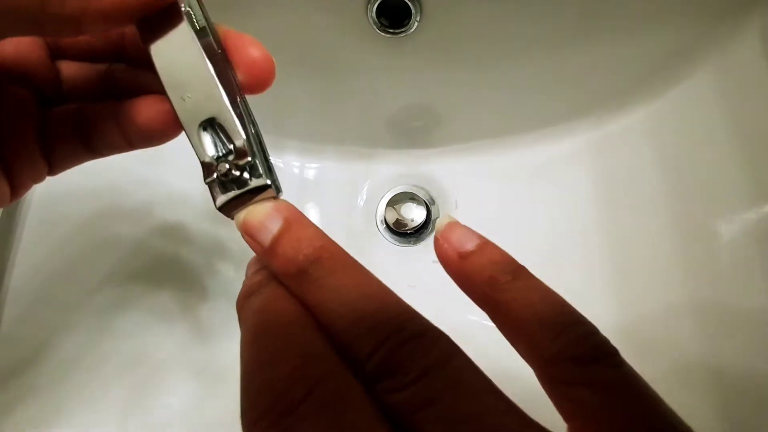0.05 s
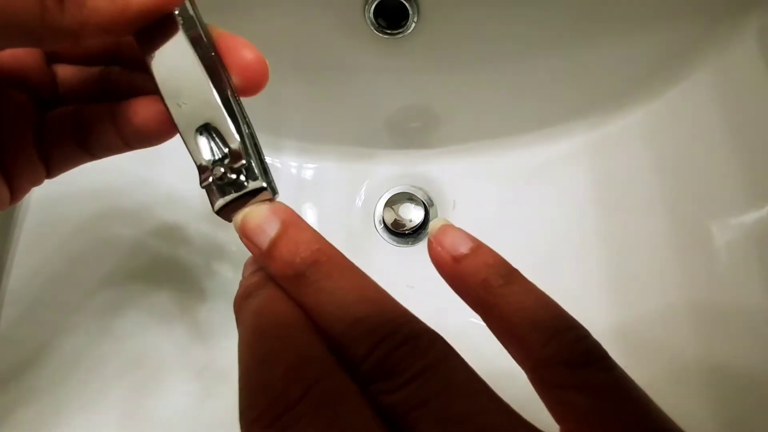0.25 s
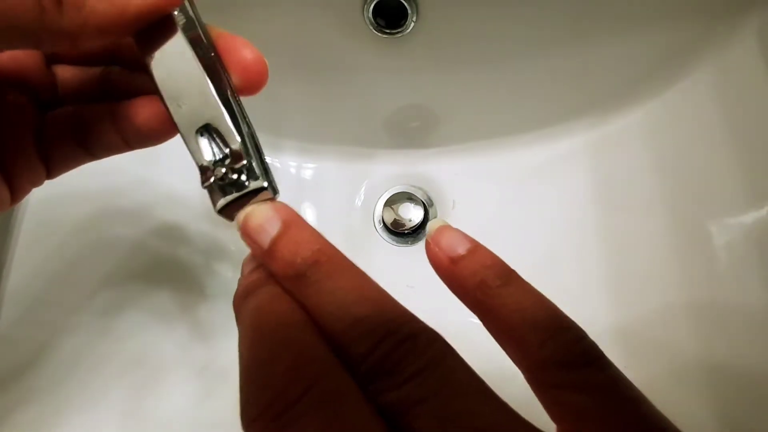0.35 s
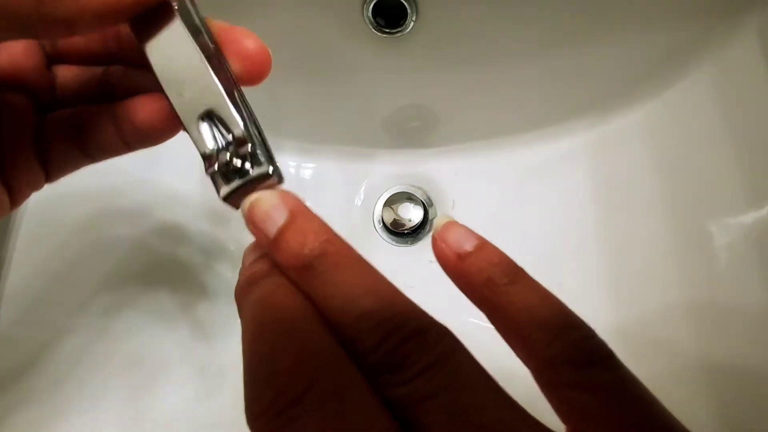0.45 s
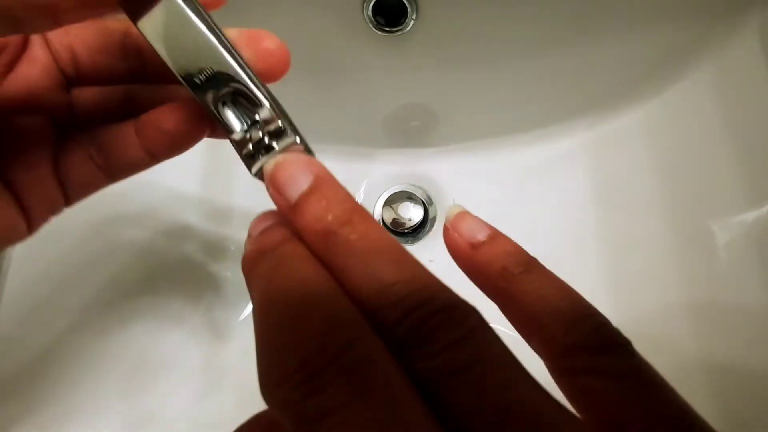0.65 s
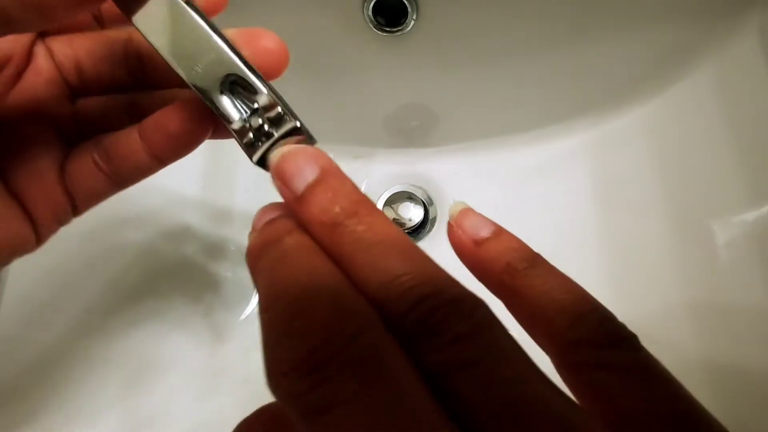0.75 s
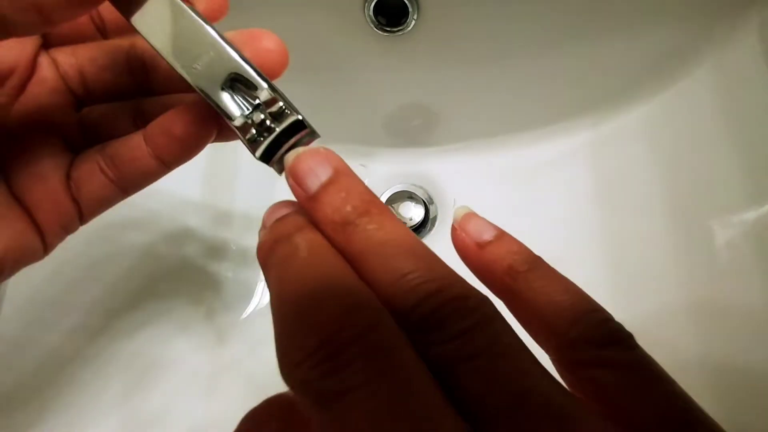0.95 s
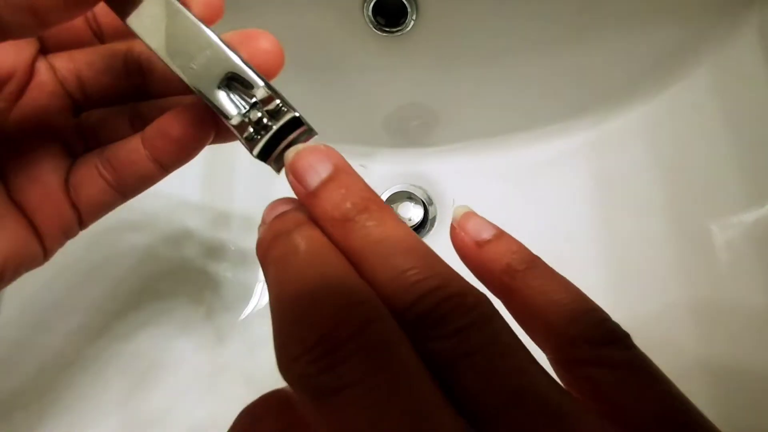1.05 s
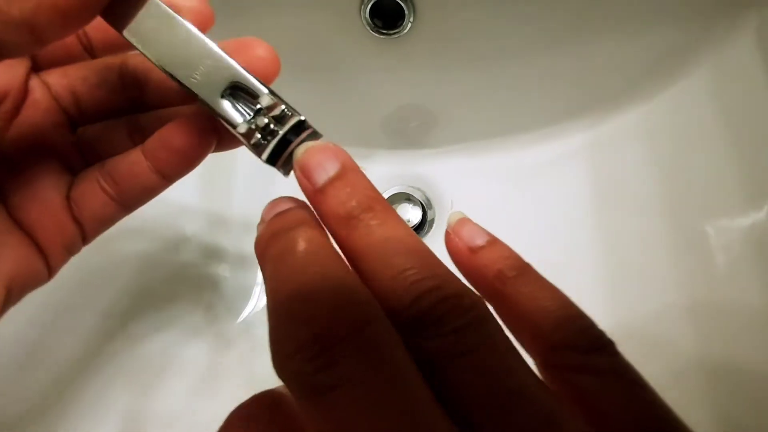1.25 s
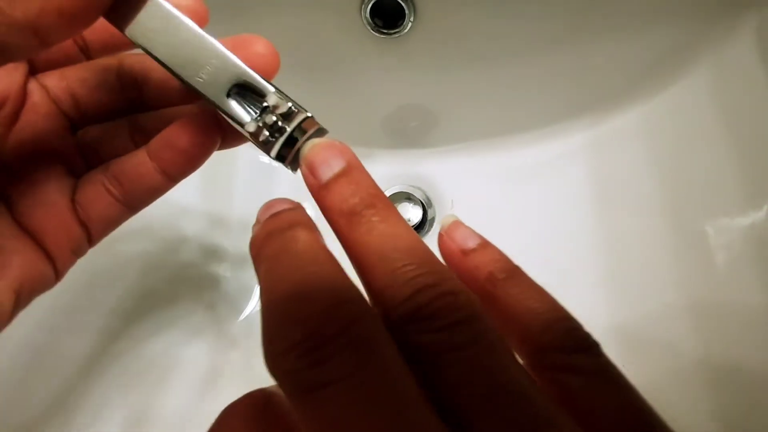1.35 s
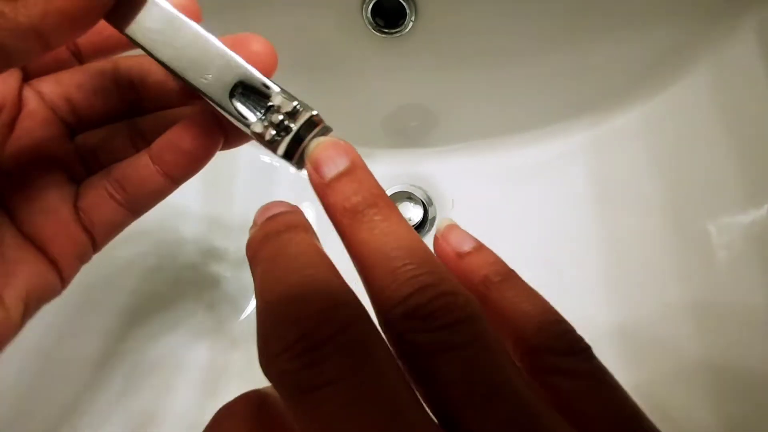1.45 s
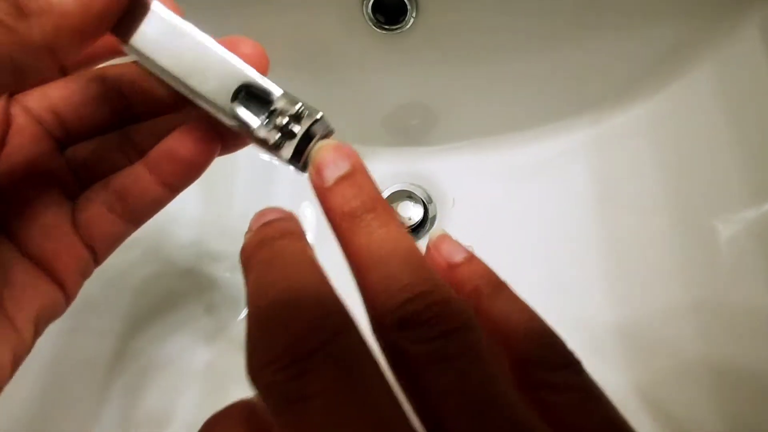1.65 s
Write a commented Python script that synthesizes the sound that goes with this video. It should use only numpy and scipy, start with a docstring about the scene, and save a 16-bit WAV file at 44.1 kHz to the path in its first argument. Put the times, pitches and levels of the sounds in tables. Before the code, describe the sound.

One hard metallic clipper click with a dull nail crack inside it, ringing briefly off basin and walls, then two tiny porcelain ticks and barely audible hand rustle, heard close on a phone microphone in a quiet bathroom.

```python
"""Nail clipper over a basin

A steel nail clipper snaps shut in a quiet tiled bathroom, close to a two-port phone microphone.
Impulses ring decaying modes for jaws, chattering lever, cracking nail and clipping ticking twice in the basin.
Shaped noise tails echo the hits; a decaying low cosine jolts mainly the left port.
Shaped noise makes finger brush, rustles, air and low rumble; sines make mains hum and a throbbing rumble."""
import sys
import numpy as np
from scipy import signal
from scipy.fft import rfft, irfft
from scipy.io import wavfile

SR = 44100
rng = np.random.default_rng(int(sys.argv[2]) if len(sys.argv) > 2 else 0)


def volts_from_db(level):
    """Convert decibel levels to linear amplitude ratios."""
    exponent = np.asarray(level, float) / 20
    return 10 ** exponent


def generate_wav(signal):
    """Clip the signal to [-1, 1] and save it as 16-bit WAV at the path in sys.argv[1]."""
    frames = np.transpose(np.atleast_2d(signal))
    scaled = np.clip(frames, -1, 1) * 32767
    pcm = np.round(scaled).astype(np.int16)
    wavfile.write(sys.argv[1], SR, pcm)


N = 74970


def evened(x):
    """Scales to rms 1."""
    return x / np.sqrt(np.mean(x ** 2) + 1e-20)


def read(points, hz):
    """Interpolates a table on a log-frequency axis."""
    f, value = np.transpose(points)
    return np.interp(np.log(hz + 1), np.log(f + 1), value)


def curve(points):
    """Joins (s, dB) rows into a gain for every sample."""
    s, db = np.transpose(points)
    return volts_from_db(np.interp(np.arange(N) / SR, s, db))


def noise(points, likeness):
    """Two-channel noise of rms 1 with a given spectrum and likeness between channels."""
    hz = np.fft.rfftfreq(N, 1 / SR)
    a, b = rfft(rng.standard_normal((2, N)))
    c = np.clip(read(likeness, hz), -1, 1)
    right = c * a + np.sqrt(1 - c ** 2) * b
    return evened(irfft(np.array([a, right]) * volts_from_db(read(points, hz)), N))


def burst(start_s, length_s, rise_s):
    """A linear rise, a plateau and a linear fall 1.6 times as long as the rise."""
    t = np.arange(N) / SR - start_s
    return np.clip(t / rise_s, 0, 1) * np.clip((length_s - t) / (1.6 * rise_s), 0, 1)


def wander(top_hz):
    """A slow random drift of rms 1: sines from 0.5 Hz up, weaker as they get faster."""
    t = np.arange(N) / SR
    rates_hz = np.geomspace(.5, top_hz, 16)
    return evened(sum(np.sin(2 * np.pi * (f * t + rng.random())) / np.sqrt(f) for f in rates_hz))


def ring(modes, tilt=((1, 0),)):
    """One blow on decaying modes of alternating sign, peak 1, with random phases at each port."""
    t = np.arange(1500) / SR
    out = np.zeros((2, len(t)))
    for k, (hz, db, t60) in enumerate(modes):
        decay = volts_from_db(db + read(tilt, hz) - 60 * t / t60)
        phase_turns = .15 * rng.random((2, 1))
        out += (-1) ** k * decay * np.sin(2 * np.pi * (hz * t + phase_turns))
    out *= np.minimum(t / .00012, 1)  # soft contact
    return out / abs(out).max()


def strike(hits, response):
    """Every impulse sets off the response."""
    return signal.fftconvolve(hits, response, axes=1)[:, :N]


def click(s, db):
    """A single impulse."""
    out = np.zeros((1, N))
    out[0, round(s * SR)] = volts_from_db(db)
    return out


def pair(s, db, pan_db):
    """An impulse that reaches the right port 0.4 ms later; pan_db is left over right."""
    return np.vstack([click(s, db + pan_db), click(s + .0004, db)])


# Jaws meet and rebound: start_s, level_db (peak, right port)
SNAPS = [(.2313, 3), (.2318, 1), (.2329, -2), (.2341, -6)]
# Steel modes: pitch_hz, level_db (relative), t60_s
JAWS = [(1150, -24, 0.0014), (2397, -23, .002), (3400, -20.5, 0.0015), (4096, -21.5, .002),
        (5180, -2.5, 0.002005), (6100, -20.5, .002), (7000, -9.5, .002), (8772, -1.5, 0.0053),
        (9497, -0.5, 0.0015), (10110, -1.5, 0.0038), (12134, -7.5, 0.0067), (14560, -7, 0.004),
        (14800, -8.5, 0.0027), (14830, -14.5, 0.00067)]


def jaws():
    """Jaw impacts ring the steel's modes."""
    pan_db = -3.5
    hits = sum(pair(s, db, pan_db) * rng.choice([-1, 1], (2, 1)) for s, db in SNAPS)
    return strike(hits, ring(JAWS))


# Lighter knocks ring the low modes less: pitch_hz, gain_db
CHATTER_TILT = [(1000, -32), (2500, -10.5), (4200, -1.5), (7000, -6), (10000, 5.5), (12400, 1.5),
                (15000, 5)]


def chatter():
    """The lever chatters: random light knocks, drawn per port, ring the jaw modes."""
    start_s, length_s, knocks_per_s = .2365, .017, 5000
    floor_db, spread_db, pan_db = -12.5, 2.5, -2
    t = np.arange(N) / SR - start_s
    on = (t > 0) & (t < length_s) & (rng.random((2, N)) < knocks_per_s / SR)
    level_db = floor_db + spread_db * np.minimum(rng.exponential(1, (2, N)), 3)
    knocks = on * volts_from_db(level_db) * rng.choice([-1, 1], (2, N))
    knocks[0] *= volts_from_db(pan_db)
    return strike(knocks, ring(JAWS, CHATTER_TILT))


# Nail modes: pitch_hz, level_db (relative), t60_s
CRACK = [(395, -9, 0.0014), (1104, 2, 0.004), (2230, 1, .002), (3200, -0.5, .002)]


def crack():
    """The nail gives way: one impulse rings its dull modes, stronger at the left port."""
    start_s, level_db, pan_db = .2315, -22.5, 7.5
    return strike(pair(start_s, level_db, pan_db), ring(CRACK))


# Bounces: start_s, level_db (peak)
TICKS = [(.5008, -36), (.5025, -39), (.504, -43), (.5343, -41), (.5358, -45), (.5368, -45)]
# Porcelain modes: pitch_hz, level_db (relative), t60_s
BASIN = [(3560, -24.5, 0.0024), (4600, -16.5, 0.0021), (5500, -18.5, 0.0037), (6850, -1, 0.00069),
         (8250, -7.5, 0.0047), (9000, -4.5, 0.0044), (9540, -9.5, 0.0052), (12200, -10, 0.0017),
         (14200, -15, 0.0028), (14940, -11.5, 0.0028)]


def clipping():
    """The cut nail bounces on the porcelain and rings its modes."""
    hits = sum(click(s, db) for s, db in TICKS)
    return strike(hits, ring(BASIN))


def jolt():
    """A low wobble of the phone body, mainly at the left port, peaking just after the snap."""
    peak_s, pitch_hz, level_db, right_db = .2442, 56, -23, -26  # right_db is relative to left
    rise_s, fall_s = .005, .0095
    t = np.arange(N) / SR - peak_s
    shape = np.where(t < 0, np.exp(-.5 * (t / rise_s) ** 2), np.exp(-abs(t) / fall_s))
    return volts_from_db(level_db) * shape * np.cos(2 * np.pi * pitch_hz * t) * np.array([[1], [volts_from_db(right_db)]])


def echo(x, decays, db, delay_s, tilt=((1, 0),)):
    """Dense reflections after a delay, each band dying at its own speed."""
    hz, t, z = signal.stft(rng.standard_normal((2, SR // 2)), SR, nperseg=128)
    fade_db = read(tilt, hz)[:, None] - 60 * t / read(decays, hz)[:, None]
    tail = signal.istft(z * volts_from_db(fade_db), SR, nperseg=128)[1]
    tail *= np.clip((np.arange(tail.shape[1]) / SR - delay_s) / 0.0035, 0, 1)
    return volts_from_db(db) * strike(x, tail / np.linalg.norm(tail[0]))


# Basin decay: pitch_hz, t60_s
BOWL = [(1000, 0.024), (3000, 0.098), (6000, 0.17), (10000, .13), (15000, 0.16)]


def basin_echo(x):
    """Early, short reflections in the basin."""
    return echo(x, BOWL, -2.5, .0012)


# Tiled room decay: pitch_hz, t60_s
WALLS = [(500, 0.452), (1500, 0.5), (3000, .42), (5000, 0.38), (7000, .26), (9500, 0.47), (11500, .2),
         (14500, .21), (16000, .17)]
# Tiled room colour: pitch_hz, gain_db
WALL_TILT = [(500, 5), (1100, 4), (2000, 6.5), (3000, 6), (4000, 8), (5200, 2.5), (6500, 7.5), (7500, -2),
             (9500, 2), (12000, 0.5), (15000, 0)]


def wall_echo(x):
    """Later, longer reflections from the walls."""
    return echo(x, WALLS, -12.5, 0.0067, WALL_TILT)


# Skin on steel: pitch_hz, density_db_per_hz (relative)
BRUSH = [(3000, -26), (7000, -22), (9000, -11.5), (10500, -32), (13200, -26), (14600, -9), (15800, -13)]


def finger_brush():
    """Skin brushes the steel: a thin burst of shaped hiss."""
    start_s, length_s, rise_s, level_db = .7, 0.075, .006, -70
    return volts_from_db(level_db) * noise(BRUSH, [(1, 0.2)]) * burst(start_s, length_s, rise_s)


# A slide, a press, a slow shift of grip: start_s, length_s, rise_s
RUSTLE_TIMES = [(.28, .18, .025), (.67, .075, .01), (1.04, .3, .05)]
# One per rustle: level_db (rms before the envelope)
RUSTLE_DB = [-61.5, -62.5, -74.5]
# One spectrum per rustle: pitch_hz, density_db_per_hz (relative)
RUSTLE = [
    [(150, -8), (300, -10.5), (550, -0.5), (1000, -12), (2200, -5), (3500, -12.5), (6000, -20)],
    [(100, -13), (170, 5), (260, -2), (450, 4.5), (700, -14.5), (2000, -19), (4000, -40)],
    [(500, -7), (1200, 5.5), (2200, -3), (4000, -9.5), (7000, -20)],
]


def hand_rustle():
    """The hands rustle softly: three bursts of shaped noise."""
    rows = zip(RUSTLE_TIMES, RUSTLE_DB, RUSTLE)
    return sum(volts_from_db(db) * noise(colour, [(1, .5)]) * burst(*when) for when, db, colour in rows)


# Mains harmonics: pitch_hz, level_db (rms before waver and swell)
HUM = [(118.4, -64.5), (236.9, -80.5), (355.3, -87), (619.1, -85.5)]


def mains_hum():
    """Steady-pitched sines whose levels waver together."""
    waver_db, waver_top_hz = 2.5, 6  # waver_db is rms
    t = np.arange(N) / SR
    gain_db = waver_db * wander(waver_top_hz)
    return sum(volts_from_db(db + gain_db) * np.sqrt(2) * np.sin(2 * np.pi * (hz * t + rng.random())) for hz, db in HUM)


# Throb, two lists in sequence: time_s, level_db (rms)
RUMBLE = [
    [(0.0, -76), (0.018, -73), (0.03, -54.5), (0.04, -85), (0.054, -69), (0.072, -75), (0.096, -90),
     (0.134, -68), (0.164, -90), (0.2, -61.5)],
    [(0.3, -57), (0.412, -62.5), (0.432, -70), (0.482, -57.5), (0.522, -65), (0.548, -62), (0.592, -70),
     (0.622, -61), (0.662, -72), (0.696, -62), (0.732, -69), (0.798, -79), (0.83, -60), (0.938, -60.5),
     (1.13, -64.5), (1.262, -95), (1.286, -74.5), (1.31, -72.5), (1.512, -61.5), (1.55, -73), (1.59, -64),
     (1.7, -79.5)],
]


def throbbing_rumble():
    """A low sine of wandering pitch, throbbing in level."""
    pitch_hz, wander_hz, wander_top_hz = 59.2, 2.3, 30.0  # wander_hz is rms
    turns = np.cumsum(pitch_hz + wander_hz * wander(wander_top_hz)) / SR
    return curve(RUMBLE[0] + RUMBLE[1]) * np.sqrt(2) * np.sin(2 * np.pi * turns)


# Low rumble: pitch_hz, density_db_per_hz (relative)
SUB = [(15, -16.5), (35, -2), (60, -5), (90, -3), (140, -6.5), (200, -47.5)]


def low_rumble():
    """Low shaped noise, partly shared by the ports."""
    return volts_from_db(-69) * noise(SUB, [(1, 0.33)])


# Room air: pitch_hz, density_db_per_hz (relative)
AIR = [(82, -15), (140, -5), (185, -10), (235, -12), (343, -11), (453, -15.5), (623, -8), (1050, -19.5),
       (1280, -20), (4480, -29.5), (15100, -33.5), (16300, -41)]
# Left-right likeness: pitch_hz, correlation (-1 to 1)
SAME = [(60, 0.88), (180, 0.78), (550, 0.25), (1650, -0.19), (4970, -0.07), (15000, -0.31)]


def room_air():
    """Soft shaped noise, alike at both ports only in the lows."""
    return volts_from_db(-66.5) * noise(AIR, SAME)


# Background swell: time_s, gain_db
AIR_SWELL = [(0, -1.5), (.2, -2), (.5, -.5), (1.15, 1.4), (1.7, -1.2)]


def room_tone():
    """Air, hum and low rumble swell together; the throbbing rumble keeps its own level."""
    return curve(AIR_SWELL) * (room_air() + mains_hum() + low_rumble()) + throbbing_rumble()


def scene():
    """Hits with the basin's and the walls' echoes over the room tone."""
    tick_feed_db, crack_feed_db = 0.5, -6.5
    snap, nail, ticks = jaws() + chatter(), crack(), clipping()
    fed = snap + volts_from_db(tick_feed_db) * ticks
    echoes = basin_echo(fed) + wall_echo(fed + volts_from_db(crack_feed_db) * nail)
    handling = jolt() + finger_brush() + hand_rustle()
    return snap + nail + ticks + echoes + handling + room_tone()


def band_limit(x):
    """A steep low-pass at the top of the band."""
    return signal.sosfilt(signal.butter(12, 16480, fs=SR, output="sos"), x)


# Microphone response: pitch_hz, gain_db
MIC = [(1000, 0), (9500, 0), (11200, -0.5), (13000, 3.5), (16000, 1)]


def record(dry):
    """Microphone colour, band limit and clipping at full scale."""
    edge_hz = 16150
    coloured = irfft(rfft(dry) * volts_from_db(read(MIC, np.fft.rfftfreq(N, 1 / SR))), N)
    lowpass = signal.firwin(255, edge_hz, window=("kaiser", 8), fs=SR)
    band = signal.oaconvolve(coloured, lowpass[None], "same")
    return band_limit(np.clip(band, -1, 1))


dry = scene()
out = record(dry)
generate_wav(out)
```